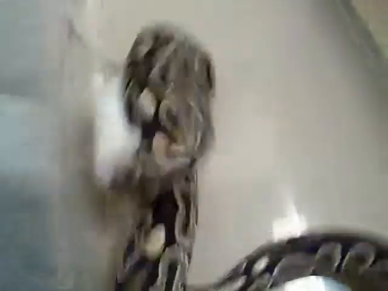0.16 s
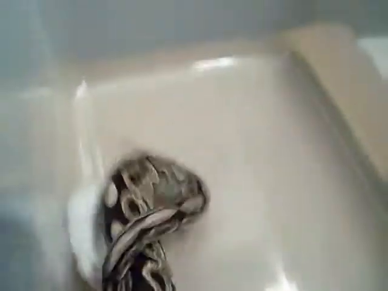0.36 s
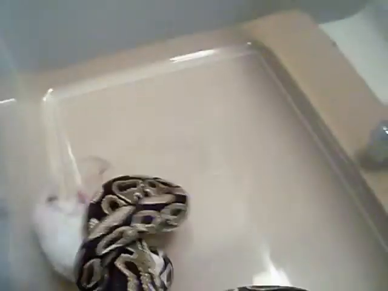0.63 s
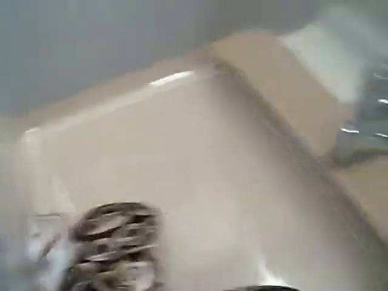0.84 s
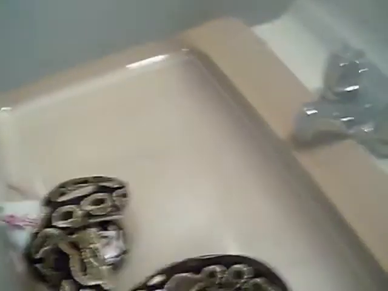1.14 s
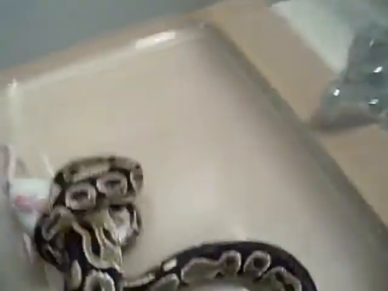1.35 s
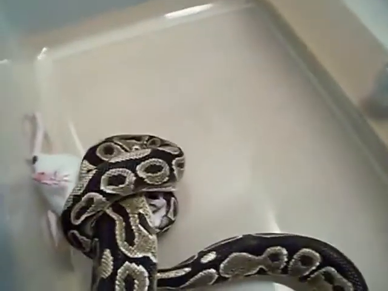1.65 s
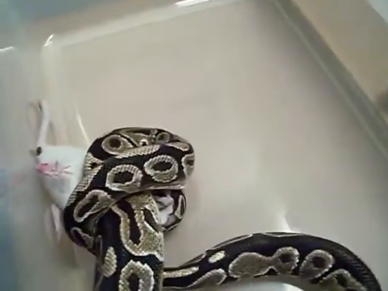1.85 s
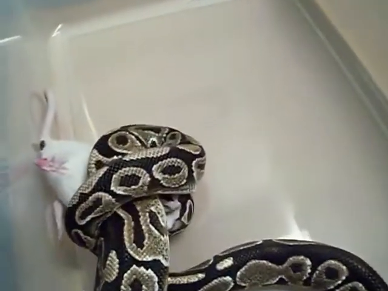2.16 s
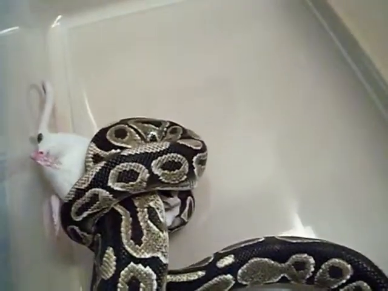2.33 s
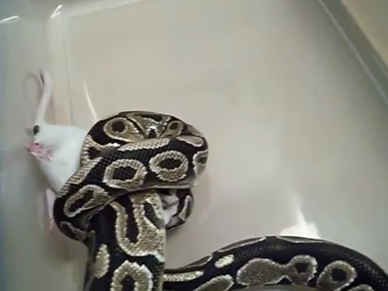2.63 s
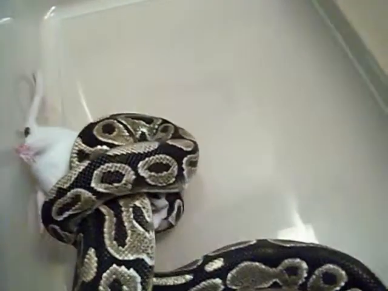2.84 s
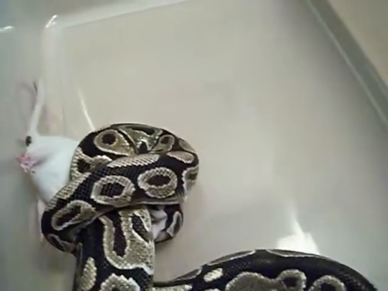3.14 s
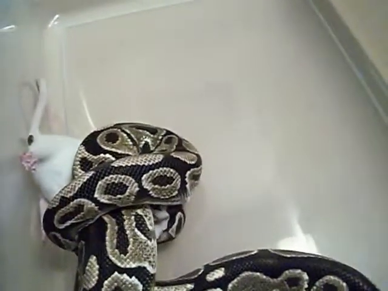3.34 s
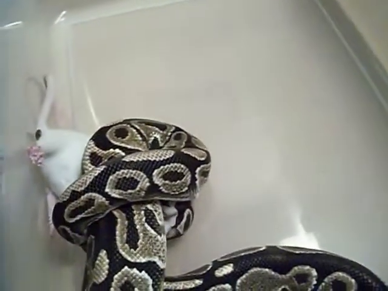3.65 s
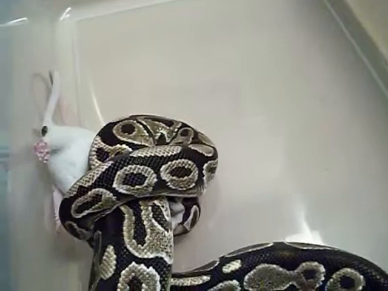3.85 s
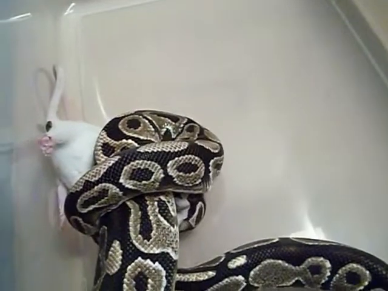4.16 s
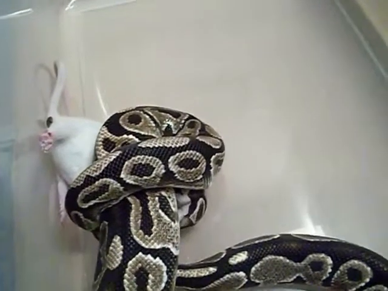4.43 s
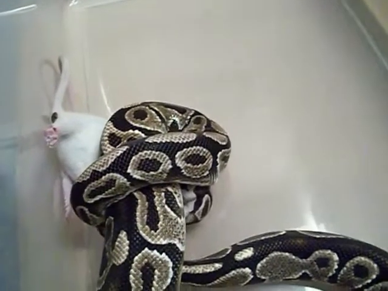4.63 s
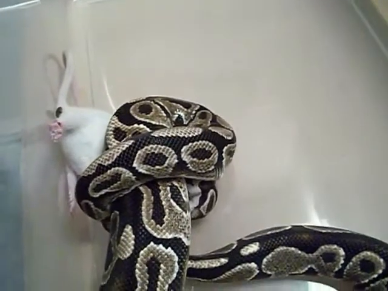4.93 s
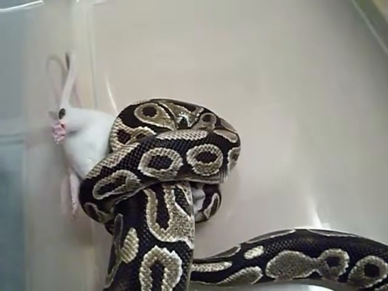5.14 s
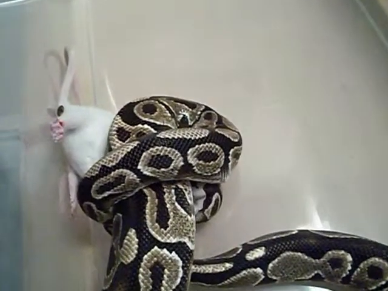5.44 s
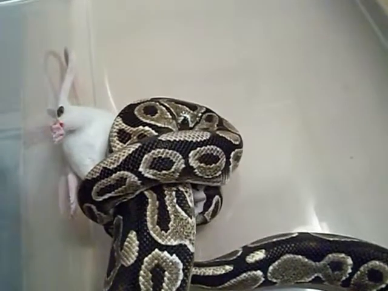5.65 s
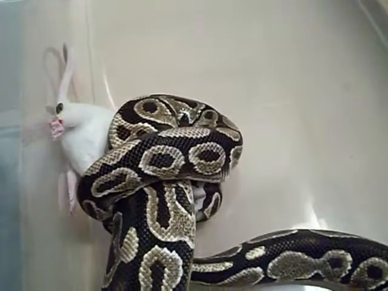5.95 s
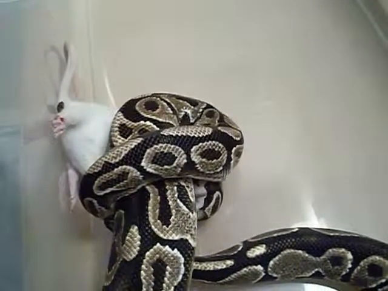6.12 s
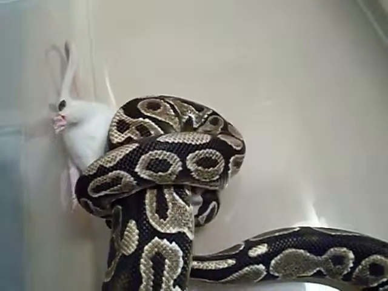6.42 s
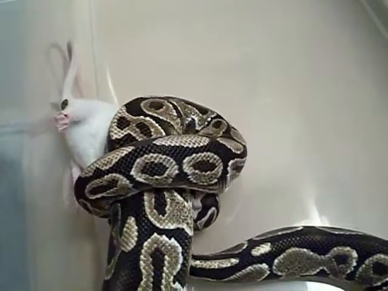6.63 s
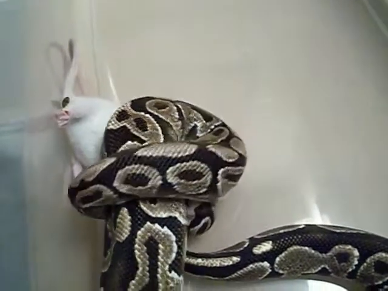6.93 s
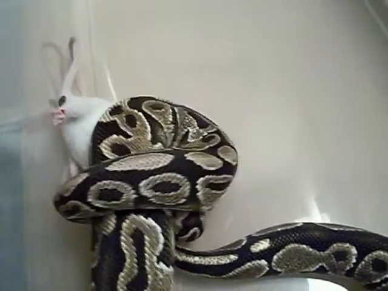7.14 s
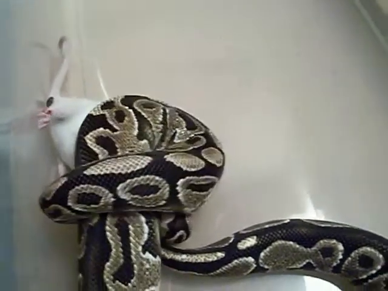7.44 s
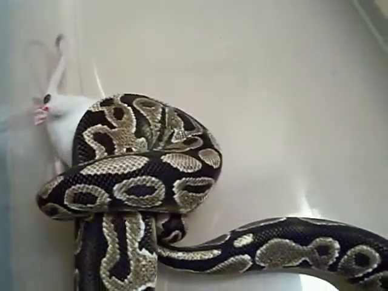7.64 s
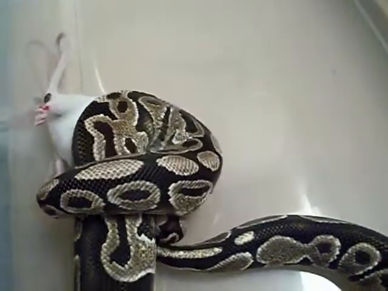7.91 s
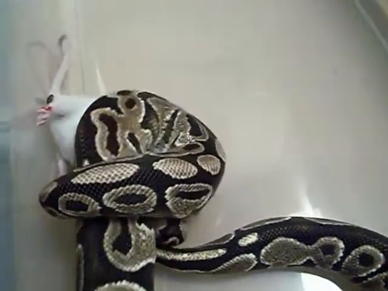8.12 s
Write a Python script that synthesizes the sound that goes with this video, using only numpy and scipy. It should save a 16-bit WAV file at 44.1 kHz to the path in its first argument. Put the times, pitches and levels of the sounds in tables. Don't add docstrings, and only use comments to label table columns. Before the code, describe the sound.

A snake grips a small rodent in a hard tub in a tiled room. Hollow thumps, claw clicks, sliding and a brief raspy scream open it, with sharp squeaks mixed in. The knocks thin out within two seconds, leaving sparse faint peeps over quiet air. Near the end, longer, louder, rough-edged squeals come in close succession. A small, coarse camera microphone gives everything a thin, gritty edge.

```python
import sys
import numpy as np
from scipy import signal
from scipy.fft import rfft, irfft
from scipy.io import wavfile
from scipy.ndimage import uniform_filter1d, minimum_filter1d

SR = 44100
rng = np.random.default_rng(int(sys.argv[2]) if len(sys.argv) > 2 else 0)


def pcm_store(signal):
    levels = np.round(np.clip(np.atleast_2d(signal), -1, 1) * 32767)
    wavfile.write(sys.argv[1], SR, levels.astype(np.int16).T)


def linear_from_db(decibels):
    return 10 ** (np.asarray(decibels, float) / 20)


N = 365148
TIME = np.arange(N) / SR

# t/s, length/s, from f/Hz, to f/Hz, level/dB
PEEPS = [(0.746, 0.018, 3302, 3372, -42.5), (0.754, 0.016, 3600, 3566, -38),
         (1.499, 0.084, 3095, 3050, -45), (1.756, .016, 3471, 3312, -42.5), (2.039, .011, 3027, 3203, -33),
         (2.063, 0.0069, 3037, 2919, -41), (2.407, 0.027, 3337, 3479, -40), (2.73, 0.0068, 3236, 2933, -39),
         (2.744, 0.039, 2850, 3056, -37.5), (3.137, 0.021, 3608, 3106, -47.5),
         (3.476, .025, 3249, 3224, -41.5), (3.857, .021, 3386, 3194, -42), (4.185, 0.026, 2978, 3360, -38),
         (4.212, 0.023, 3106, 2964, -36.5), (4.245, 0.033, 3131, 2989, -43),
         (4.46, .025, 3320, 3090, -41.5)]
# t/s, length/s, pitch f/Hz, level/dB, strain/0-1
YELPS = [
    (0.232, .04, 3244, -31.5, 0.26),
    (1.744, .013, 3136, -46, 0.83),
    (2.433, .022, 2717, -41.5, 0.93),
    (3.154, 0.018, 2788, -35, 0.66),
    (3.455, 0.013, 2853, -39, 0.82),
    (3.462, .011, 2876, -34, 0.45),
]
# t/s, pitch f/Hz, level/dB, strain/0-1
CRY_STEPPED = [(0.39, 3296, -30.5, .3), (0.398, 3426, -45, 1), (0.408, 3423, -33, 0.94),
               (0.434, 3370, -35, 0.55), (0.446, 3140, -38, .3), (0.458, 3275, -46, .3),
               (0.47, 3006, -52.5, 0.94), (0.59, 3290, -61, 0.87), (0.6, 3051, -47, 0.35)]
CRY_GRIPPED = [(0.99, 3250, -26.5, 0.3), (0.996, 3346, -32.5, 0.36), (1.02, 3506, -25.5, 0.13),
               (1.102, 3205, -33.5, 0.33), (1.178, 3414, -31, 0), (1.21, 3371, -29, 0.6),
               (1.224, 2885, -35, 0.6), (1.24, 2190, -38.5, 0.3), (1.247, 2119, -42.5, 0.2)]
CRY_ARCHED = [(4.835, 3193, -39, .1), (4.843, 3289, -41.5, .1), (4.873, 3279, -30.5, .05),
              (4.893, 3188, -42, .05), (4.915, 3052, -34, .1), (4.945, 2522, -50.5, .5)]
CRY_SAGGING = [(6.262, 3209, -42, .2), (6.288, 3323, -29.5, .2), (6.308, 3056, -27, .65),
               (6.322, 3101, -23, 0.36), (6.37, 3060, -25, 0.51), (6.382, 3062, -27.5, 0.54),
               (6.449, 3004, -27, 0.38), (6.466, 2424, -30, 0.79), (6.486, 2781, -32, .6)]
CRY_LONG = [(6.736, 3140, -28, 0.44), (6.746, 2684, -25.5, 0.47), (6.763, 3282, -20, 0.44),
            (6.805, 3475, -27, 0.51), (6.955, 3496, -27.5, 0.51), (6.968, 3530, -31, 0.36),
            (7.024, 3350, -24.5, .2), (7.046, 2923, -26.5, 0.23), (7.06, 3137, -36, 0.19)]
CRY_LOUD = [(7.251, 3243, -27, 0.25), (7.259, 3247, -24.5, 0.38), (7.269, 3390, -21, 0.2),
            (7.289, 3374, -19.5, 0.2), (7.307, 3382, -26, 0.12), (7.341, 3292, -20.5, 0.088),
            (7.381, 3268, -23.5, 0.14), (7.412, 3146, -37.5, 0.15)]
CRY_BROKEN = [(7.644, 3367, -31.5, 0.31), (7.652, 3200, -24, 0.17), (7.676, 3480, -35.5, 0.14),
              (7.738, 3568, -35.5, 0.25), (7.772, 3543, -46, 0.15), (7.782, 3351, -25, 0.094),
              (7.82, 3400, -29, 0.14), (7.862, 2882, -32, 0.22), (7.872, 2969, -41.5, 0.2)]
CRY_LAST = [(8.062, 3307, -24.5, 0.1), (8.07, 3323, -25, 0.1), (8.076, 3505, -32.5, 0.1),
            (8.086, 3554, -32, 0.1), (8.17, 3388, -33.5, 0.1), (8.18, 3448, -43.5, 0.1),
            (8.208, 3360, -37, 0.1), (8.214, 3239, -29, 0.1), (8.232, 3377, -30, 0.1)]
# f/Hz, level/dB per Hz
THROAT = [(300, -33), (1100, -18.5), (1600, -2), (2100, -27), (2800, 9), (4200, -19.5), (4700, -4.5),
          (5200, 5), (5800, -15), (6500, -6)]
# t/s, length/s, from f/Hz, to f/Hz, tone level/dB, octave level/dB
VOICE_CRACKS = [
    (3.871, .009, 3200, 2400, -45, -54),
    (4.473, .013, 3100, 2350, -44, -50),
    (7.407, .011, 3200, 2700, -36, -60),
    (8.224, .012, 3250, 2800, -34, -64),
]
# t/s, half pitch f/Hz, level/dB
SCREAM = [
    (0.106, 1675, -45),
    (0.116, 1702, -39.5),
    (0.198, 1736, -43.5),
    (0.222, 1690, -48.5),
]
# f/Hz, level/dB per Hz
SCREAM_HISS = [(180, -27), (300, -32), (860, -23.5), (1020, -10), (1460, -17), (1760, -3), (2040, -11.5),
               (3680, -8), (6000, -5.5), (7800, -58.5), (13200, -120)]
# t/s, struggle level/dB
SCUFFLE = [
    (0.0, -70.5),
    (0.138, -57.5),
    (0.27, -46),
    (0.37, -62.5),
    (0.52, -68.5),
    (0.594, -51.5),
    (0.8, -60),
    (1.01, -73),
    (1.3, -71),
    (1.62, -96),
]
# f/Hz, level/dB per Hz
RUMBLE = [(15, -35), (25, -7), (164, -16), (261, 0), (329, -16.5), (1030, -8.5), (1800, -35), (2340, -75.5),
          (3960, -120)]
SCRATCH = [(760, -31.5), (1300, 5.5), (1760, -13), (3200, 1.5), (5110, -9.5), (6000, -22.5), (7800, -53),
           (13200, -120)]
# t/s, strength level/dB, hardness/0-1
KNOCKS = [(0.036, -60.5, 0.91), (0.075, -38.5, 0.14), (0.09, -39.5, 0.79), (0.112, -28, .5),
          (0.213, -24, 0.5), (0.248, -25.5, 0.25), (0.53, -40, 0.7), (0.606, -26.5, 0.69),
          (0.671, -48, 0.3), (0.703, -60.5, 1), (0.795, -28, 0), (0.832, -42.5, 0.42), (1.066, -52.5, 0.85),
          (1.169, -34, 0.75), (1.29, -49, 0.34), (1.364, -67, 1), (1.429, -51, 0.8), (1.688, -60.5, 0.81),
          (1.876, -57.5, 0.81), (5.947, -57, 0)]
# t/s, tick level/dB
CLAWS = [
    (0.236, -11.5),
    (0.262, -17),
    (0.494, -57),
    (0.936, -46),
    (1.474, -41),
    (2.021, -46),
    (2.112, -45),
]
# t/s, thud level/dB
BUMPS = [
    (0.113, -44.5),
    (0.235, -46.5),
    (0.493, -40.5),
    (0.606, -43),
    (0.793, -55.5),
    (0.834, -48),
]
# f/Hz, level/dB, t60/s
SHELL = [(243, -7.5, 0.45), (460.7, -11, 0.53), (618.3, -4.5, 0.23), (802.6, -25.5, 0.27), (950, 2, 0.024),
         (1056, -21.5, 0.22), (1420, -15.5, 0.087)]
# f/Hz, level/dB per Hz
AIR = [(12, -46.5), (20, -13.5), (32, -12), (46, -7.5), (66, -0.5), (92, -15), (123, -8), (145, -12.5),
       (239, -13), (270, -16.5), (637, -19), (978, -18.5), (1690, -27), (4510, -29.5), (6000, -29),
       (7800, -63), (13200, -120)]
# f/Hz, level/dB
PLAYER = [(5000, 4), (5700, 1.5), (6100, -10), (6500, -20.5), (7000, -33.5), (7800, -68.5), (8600, -44),
          (9300, -64), (11000, -83.5), (14700, -60.5), (15500, -55), (15800, -88)]

BEND_SHARE, ONSET_DB, FADE_DB, BREAK_S = 0.24, 1, -0.5, 0.003
PEEP_STRAIN, YELP_SAG_HZ_PER_S = 0.33, 8000
OCTAVE_DB, HALF_DB, HALF_STRAIN_DB, BREATH_DB, BREATH_STRAIN_DB = -4.5, -53.5, 43.5, -41.5, 38.5
BRIGHT_HZ, OCTAVE_DB_PER_KHZ = 2570, -12.5
SLIDE_STRAIN = 0.17
FLUTTER_DB, FLUTTER_HZ = 0.9, 90
SCREAM_PARTIALS_DB, SCREAM_HISS_DB = [1.6, -5.5, -12], 3.5
THUD_DB, SOFT_CRACK_DB, HARD_GAIN_DB, TICK_DB, CLAW_CRACK_DB = -24.5, -27.5, 41, -7, -11.5
SCRATCH_DB, SCRATCH_FOLLOWS = -70, 0.23
AIR_DB = -69
CAMERA_HZ = 12000


def unit(x):
    return x / np.sqrt(np.mean(x ** 2))


def shape(x, points):
    hz, db = np.transpose(points)
    bins_hz = np.maximum(np.fft.rfftfreq(len(x), 1 / SR), 1)
    gain_db = np.interp(np.log(bins_hz), np.log(hz), db)
    return irfft(rfft(x) * linear_from_db(gain_db), len(x))


def noise(points):
    return unit(shape(rng.standard_normal(N), points))


def walk(rate_hz):
    k = int(SR / rate_hz)
    return unit(uniform_filter1d(uniform_filter1d(rng.standard_normal(N), k), k))


def squeaks():
    calls = [note(*peep, PEEP_STRAIN) for peep in PEEPS]
    for s, length_s, hz, db, strain in YELPS:
        calls.append(note(s, length_s, hz, hz - YELP_SAG_HZ_PER_S * length_s, db, strain))
    calls += [CRY_STEPPED, CRY_GRIPPED, CRY_ARCHED, CRY_SAGGING, CRY_LONG, CRY_LOUD, CRY_BROKEN, CRY_LAST]
    gate, (hz, tone_db, strain) = voice_curves(calls)
    slide = np.clip(uniform_filter1d(np.abs(np.gradient(hz)) * SR / 20000, size=400), 0, 1)
    strain = np.clip(strain + SLIDE_STRAIN * slide, 0, 1)
    turn = phase(hz, 0.0015 + 0.02 * slide)

    tone = unsteady(turn, 0.05 + 0.3 * slide + 0.3 * strain ** 2, 300)
    octave_db = OCTAVE_DB + OCTAVE_DB_PER_KHZ * np.abs(hz - BRIGHT_HZ) / 1000
    octave = linear_from_db(octave_db) * unsteady(2 * turn, 0.98, 350)
    half_lines = unsteady(turn / 2, 0.75, 200) + linear_from_db(-4) * unsteady(3 * turn / 2, 0.36, 360)
    doubled = linear_from_db(HALF_DB + HALF_STRAIN_DB * strain ** 2) * half_lines
    breath = linear_from_db(BREATH_DB + BREATH_STRAIN_DB * strain + 5.2 * walk(150)) * noise(THROAT)
    pressure = linear_from_db(tone_db + FLUTTER_DB * walk(FLUTTER_HZ))
    return gate * pressure * (tone + octave + doubled + breath)


def note(s, length_s, from_hz, to_hz, db, strain):
    bend_hz = from_hz + BEND_SHARE * (to_hz - from_hz)
    return [(s, from_hz, db + ONSET_DB, strain),
            (s + BEND_SHARE * length_s, bend_hz, db, strain),
            (s + length_s - BREAK_S, to_hz, db + FADE_DB, strain)]


def voice_curves(calls):
    rows = np.concatenate(calls)
    rows = rows[np.argsort(rows[:, 0], kind="stable")]
    gate = sum((TIME > c[0][0]) & (TIME < c[-1][0]) for c in calls) > 0
    linked = minimum_filter1d(-minimum_filter1d(-1.0 * gate, size=601), size=601)
    # pitch, level and strain are smoothed over 3 ms, so joints do not click
    curves = [uniform_filter1d(np.interp(TIME, rows[:, 0], c), size=130) for c in rows.T[1:]]
    return uniform_filter1d(linked, size=150), curves


def phase(hz, jitter):
    wavering_hz = hz * (1 + jitter * walk(200) + 0.004 * walk(55))
    return 2 * np.pi * np.cumsum(wavering_hz) / SR


def unsteady(turn, rough, rate_hz):
    chance = (walk(rate_hz) + 1j * walk(rate_hz)) / 2 ** 0.5
    return np.real((1 - rough + rough * chance) * np.exp(1j * turn)) * 2 ** 0.5


def voice_cracks():
    out = np.zeros(N)
    for s, length_s, from_hz, to_hz, tone_db, octave_db in VOICE_CRACKS:
        count, i = int(length_s * SR), int(s * SR)
        turn = 2 * np.pi * np.cumsum(np.linspace(from_hz, to_hz, count)) / SR
        chirp = linear_from_db(tone_db) * np.sin(turn) + linear_from_db(octave_db) * np.sin(2 * turn)
        out[i:i + count] += np.hanning(count) ** 0.5 * 2 * chirp
    return out


def scream():
    gate, (hz, level_db) = voice_curves([SCREAM])
    turn = phase(hz, 0.022)
    stack = sum(linear_from_db(db) * unsteady((k + 1) * turn, 0.7, 268.8) for k, db in enumerate(SCREAM_PARTIALS_DB))
    hiss = linear_from_db(SCREAM_HISS_DB + 2.5 * walk(250) + 2.7 * walk(60)) * noise(SCREAM_HISS)
    return gate * linear_from_db(level_db) * (stack + hiss)


def scuffle():
    struggle_db = np.interp(TIME, *np.transpose(SCUFFLE))
    grains = rng.standard_normal((2, N)) * linear_from_db(4.4 * rng.exponential(size=(2, N)))
    rumble_db = struggle_db + 3 * walk(40)
    scratch_db = SCRATCH_DB + SCRATCH_FOLLOWS * (struggle_db + 59) + 3.5 * walk(70)
    rumble = linear_from_db(rumble_db) * unit(shape(grains[0], RUMBLE))
    scratch = linear_from_db(scratch_db) * unit(shape(grains[1], SCRATCH))
    return (rumble + scratch) * (TIME < SCUFFLE[-1][0])


def knocks():
    hits = []  # t/s, thud/dB, boom/dB, crack/dB, tick/dB
    for s, blow_db, hard in KNOCKS:
        crack_db = blow_db + SOFT_CRACK_DB + HARD_GAIN_DB * hard
        hits.append((s, blow_db + THUD_DB, blow_db, crack_db, crack_db + TICK_DB))
    hits += [(s, -120, -120, db + CLAW_CRACK_DB, db) for s, db in CLAWS]
    hits += [(s, db, -120, -120, -120) for s, db in BUMPS]
    out = np.zeros(N + SR)
    for s, *levels_db in hits:
        sound = shell_hit(*levels_db)
        i = int(s * SR)
        out[i:i + len(sound)] += sound
    return out[:N]


def shell_hit(thud_db, boom_db, crack_db, tick_db):
    t = TIME[:SR // 5]
    hz, db, t60_s = np.transpose(SHELL)
    level_chance, pitch_chance = rng.standard_normal((2, len(hz)))

    def burst(lo_hz, hi_hz, decay_s):
        return unit(band(rng.standard_normal(len(t)), lo_hz, hi_hz)) * linear_from_db(-60 * t / decay_s)

    modes = np.sin(2 * np.pi * np.outer(hz * (1 + 0.017 * pitch_chance), t))
    decays = linear_from_db(-60 * np.outer(1 / np.minimum(t60_s, 0.2), t))
    ring = linear_from_db(db + 0.87 * level_chance) @ (modes * decays)
    boom = ring / np.abs(ring).max() + 0.78 * burst(250, 920, 0.079)
    crack = burst(1000, 3900, 0.023)
    tick = burst(6400, 8800, 0.022)
    thud = burst(130, 240, 0.2) + 1.2 * np.sin(2 * np.pi * 65 * t) * linear_from_db(-60 * t / 0.11)
    low = linear_from_db(thud_db - 0.5) * thud + linear_from_db(boom_db - 3.5) * boom
    return low + linear_from_db(crack_db - 1.5) * crack + linear_from_db(tick_db + 2.5) * tick


def band(x, lo_hz, hi_hz):
    return signal.sosfilt(signal.butter(2, [lo_hz, hi_hz], "bandpass", fs=SR, output="sos"), x)


def bathroom(x, tub_db=-9, tub_t60_s=0.063, room_db=-11, room_t60_s=0.21):
    t = TIME[:SR // 2]
    tub = rng.standard_normal(len(t)) * linear_from_db(-60 * t / tub_t60_s) * (t > 0.001)
    tiles = rng.standard_normal(len(t)) * linear_from_db(-60 * t / room_t60_s) * np.minimum(t / 0.027, 1)
    echo = linear_from_db(tub_db) * tub / np.linalg.norm(tub) + linear_from_db(room_db) * tiles / np.linalg.norm(tiles)
    return x + signal.fftconvolve(x, echo)[:N]


def still_air():
    return linear_from_db(AIR_DB + 0.2 * walk(14)) * noise(AIR)


def scene():
    air = still_air()
    sources = squeaks() + voice_cracks() + scream() + scuffle() + knocks()
    return (bathroom(sources) + air)[None]


def top_cut(x):
    return signal.sosfilt(signal.butter(12, 15700, fs=SR, output="sos"), x)


def record(dry):
    loudness = uniform_filter1d(np.abs(dry[0]), int(0.019 * SR))
    step_hiss = linear_from_db(-30.5) * loudness * rng.standard_normal(N)
    half_hz = CAMERA_HZ / 2
    camera_filter = [(20, 0), (half_hz - 300, 0), (half_hz, -5), (half_hz + 300, -30), (half_hz + 600, -90)]
    kept = shape(dry[0] + step_hiss, camera_filter)
    mirrored = kept * (1 + 2 * np.cos(2 * np.pi * CAMERA_HZ * TIME))
    return top_cut(shape(mirrored, PLAYER)[None])


dry = scene()
out = record(dry)
pcm_store(out)
```